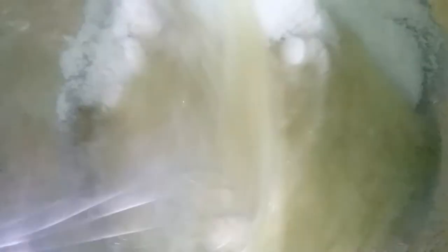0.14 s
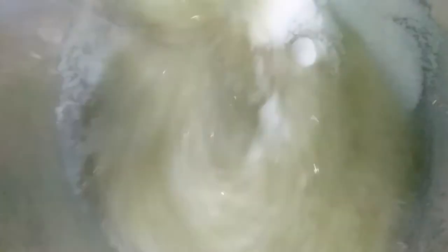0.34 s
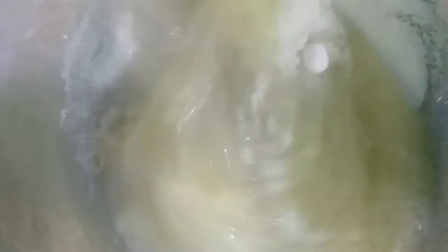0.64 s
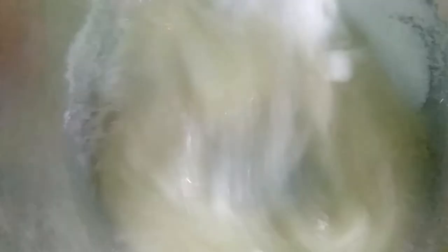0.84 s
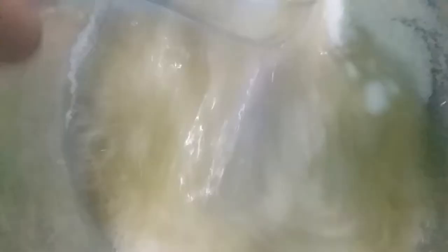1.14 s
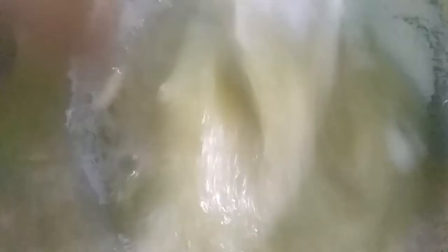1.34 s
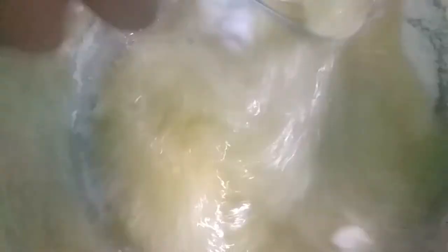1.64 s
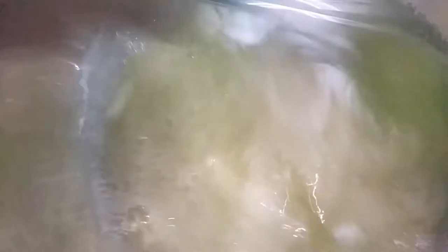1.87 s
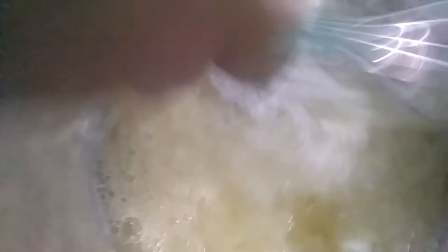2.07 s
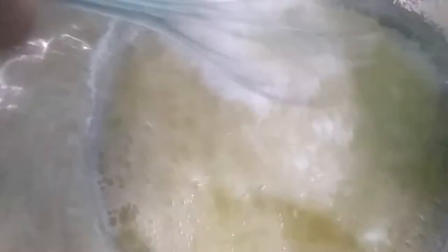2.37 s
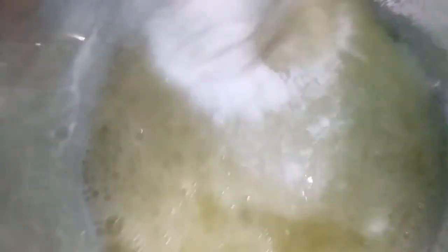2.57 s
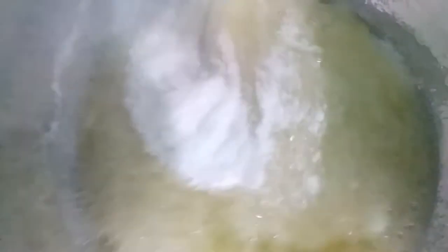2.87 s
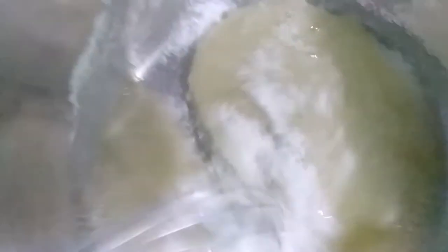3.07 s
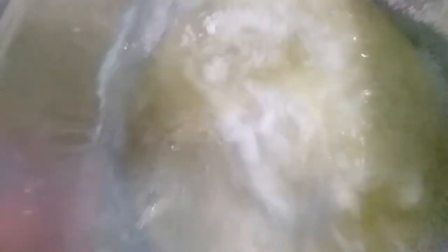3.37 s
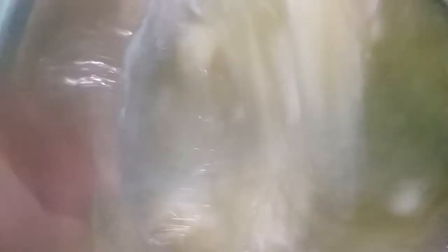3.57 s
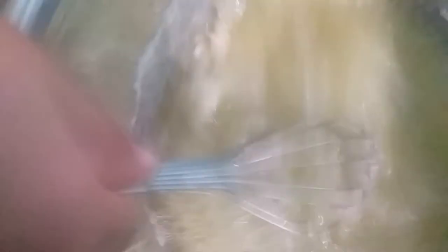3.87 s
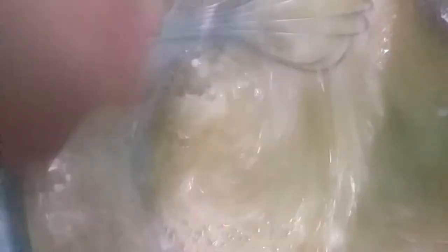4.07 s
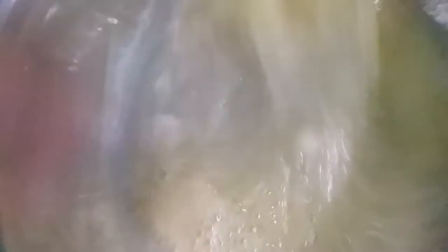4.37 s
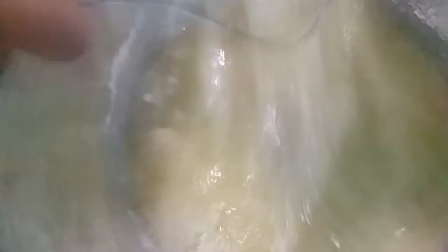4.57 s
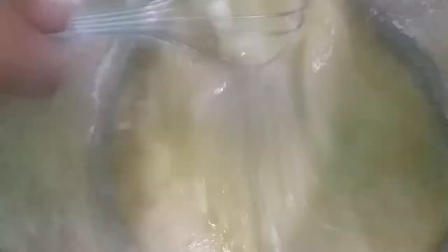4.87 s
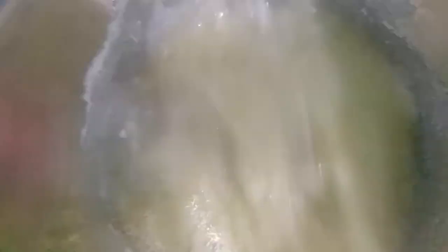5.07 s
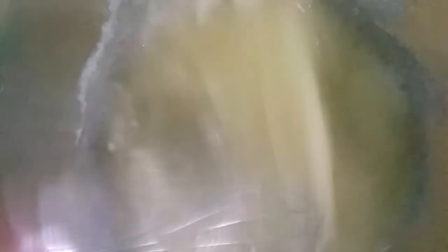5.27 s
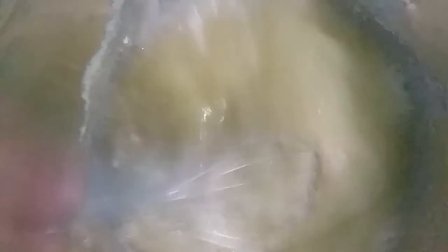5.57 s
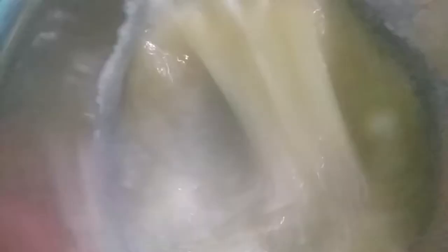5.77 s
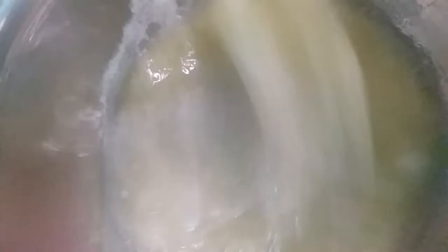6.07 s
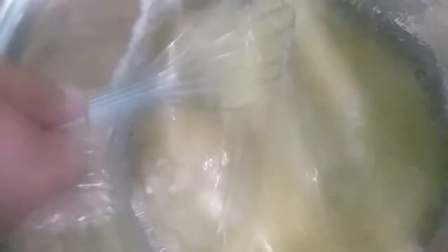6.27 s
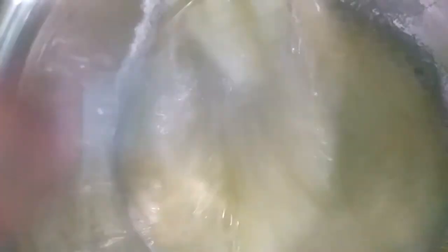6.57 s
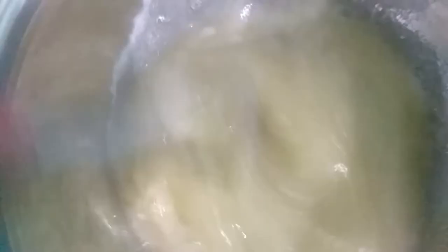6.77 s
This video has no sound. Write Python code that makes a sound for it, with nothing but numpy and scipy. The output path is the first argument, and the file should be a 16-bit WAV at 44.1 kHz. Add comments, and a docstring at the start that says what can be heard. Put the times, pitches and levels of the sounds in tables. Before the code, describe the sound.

Hand whisking in a small kitchen, heard close and mono. Wires rattle on the bowl in spaced, hard strokes at first, with bright scraping and metallic ringing, then in a busier run of damp clacks. Between hits, froth fizzes, liquid sloshes and an occasional plop sounds. Steady low appliance noise stays faintly behind.

```python
"""Whisk in a metal bowl

A wire whisk beats egg white in a metal bowl, close to a small microphone in a kitchen.
Each blow is a random rattle of wires that cracks, knocks and rings the wet bowl. Between blows,
filtered grains make wires dragging through froth, low noise slops, and fading modes thump, plop and ring.
Thin ticks are wires snapping together; a short room tail and faint appliance noise lie behind."""
import sys
import numpy as np
from scipy import signal
from scipy.fft import rfft, irfft
from scipy.io import wavfile
from scipy.ndimage import uniform_filter1d

SR = 44100
rng = np.random.default_rng(int(sys.argv[2]) if len(sys.argv) > 2 else 0)


def generate_wav(sig):
    """Save sig (samples, or channels by samples) to the path in sys.argv[1] as 16-bit PCM at SR."""
    pcm = np.round(np.clip(np.atleast_2d(sig).T, -1, 1) * 32767).astype(np.int16)
    wavfile.write(sys.argv[1], SR, pcm)


N = 305172


def amp(db):
    """Linear gain of a level in dB."""
    return 10 ** (np.asarray(db, float) / 20)


def level(x, db):
    """Scale a sound to an RMS level in dB."""
    return x * amp(db) / np.sqrt(np.mean(x ** 2))


def colour(points, size=1024):
    """Causal response of a spectrum, folded from the cepstrum of its log gain."""
    hz, db = np.transpose(points)
    grid_hz = np.arange(size + 1) * SR / 2 / size
    gain_db = np.interp(np.log(grid_hz + 1), np.log(hz), db)
    cepstrum = irfft(np.log(amp(gain_db)))
    cepstrum[1:size] *= 2
    cepstrum[size + 1:] = 0
    return irfft(np.exp(rfft(cepstrum)))[:size]


def rings(modes, seconds):
    """One sine per mode (f/Hz, level/dB, t60/s), fading exponentially."""
    t = np.arange(int(seconds * SR)) / SR
    return np.array([amp(db) * np.exp(-np.log(1000) * t / t60) * np.sin(2 * np.pi * hz * t)
                     for hz, db, t60 in modes])


def walk(rate):
    """Random levels held 1 / rate s and slewed twice; spread near 1."""
    k = int(SR / rate)
    steps = np.repeat(rng.standard_normal(N // k + 1), k)
    return 2.0 * uniform_filter1d(uniform_filter1d(steps, k), k)[:N]


def band_noise(order, low_hz, high_hz):
    """White noise through a Butterworth band."""
    band = signal.butter(order, [low_hz, high_hz], "bandpass", fs=SR, output="sos")
    return signal.sosfilt(band, rng.standard_normal(N))


def blur(note, width, db):
    """Moving froth roughens a ring: smoothed noise modulates its strength."""
    flutter = np.convolve(rng.standard_normal(len(note)), np.hanning(width), "same")
    return note * (1 + level(flutter, db))


def add(out, s, sound, peak_db):
    """Mix a sound in at a time, scaled to a peak."""
    i = int(s * SR)
    out[i:i + len(sound)] += (sound * amp(peak_db) / np.max(np.abs(sound)))[:N - i]


# spectrum of the kitchen air: f/Hz, relative level/dB per Hz
KITCHEN_SPECTRUM = [(15, -66), (25, 4.5), (317, -15.5), (373, -5.5), (754, -8), (1020, 6), (1260, 0.5),
                    (3340, -4), (5280, -11), (9840, -31), (16000, -33)]
KITCHEN_DB = -55
HUM_HZ, HUM_WIDTH_HZ, HUM_DB = 114.2, 21, -55


def kitchen():
    """Steady appliance noise with a blurred hum: coloured noise plus noise through a resonance."""
    air = signal.fftconvolve(rng.standard_normal(N), colour(KITCHEN_SPECTRUM, size=4096))[:N]
    hum_band = signal.iirpeak(HUM_HZ, HUM_HZ / HUM_WIDTH_HZ, fs=SR)
    hum = signal.lfilter(*hum_band, rng.standard_normal(N))
    return level(air, KITCHEN_DB) + level(hum, HUM_DB)


# how far the whisk beats above the liquid, on bare wall: t/s, bareness (0 submerged - 1 bare)
BARE = [(0.0, 0.27), (0.8, 0.62), (1.35, 0.039), (1.47, 0.7), (1.62, 0.22), (2.04, 0.77), (2.72, 0.86),
        (2.87, 0.11), (3.12, 0.16), (3.4, 0.56), (4.5, 0.32), (5.4, 0.089), (5.85, 0.2), (6.9, 0.14)]


def bareness(t):
    """Height of the whisk above the liquid, interpolated in time."""
    return np.interp(t, *np.transpose(BARE))


def by_bareness(wet, bare_wall, bare):
    """Blend a setting from submerged to bare wall."""
    return wet + (bare_wall - wet) * bare


def froth_grains(level_db):
    """Tiny pops and wire ticks, each band with its own pitch, flicker over a hiss."""
    grains = level(rng.standard_normal(N), -6) * amp(2.2 * walk(40))
    for hz in 1700 * 1.24 ** np.arange(8):
        pops = (rng.random(N) < .008) * rng.standard_normal(N) * amp(3.2 * walk(70))
        note = rings([(hz, 0, 10.5 / hz)], .02)[0]  # a few cycles
        note[0] = 0.13  # the snap that starts it
        grains = grains + level(signal.fftconvolve(pops, note)[:N], -11.5)
    return grains * amp(1.2 * walk(60) + level_db)


SETTLED_DB = -62.5  # relative level of still froth
AIR_HZ, AIR_TOP_HZ, AIR_DB = 9900, 15300, -77.5
AIR_FOLLOW = 0.64  # the hiss follows the sweeps only in part


def foam_hiss(level_db):
    """Fine treble hiss of the foam: flickering band noise."""
    air = band_noise(3, AIR_HZ, AIR_TOP_HZ)
    follow_db = AIR_FOLLOW * (level_db - SETTLED_DB)
    return air * amp(AIR_DB + follow_db + 1.4 * walk(16) + 2.7 * walk(90))


# slopping liquid: t/s, level/dB before the stirring is added
SLOP = [(0.0, -47.5), (1.5, -49.5), (3.18, -50), (3.78, -49), (4.49, -52.5), (5.03, -39.5), (5.17, -52.5),
        (6.73, -50.5), (6.92, -54)]
STIR_DB = -15  # low slosh dragged along by a sweep, against the listed sweep level


def slop(level_db, t):
    """Liquid slops low: uneven bass noise, stronger while the wires stir it."""
    slosh = level(band_noise(2, 70, 450) * amp(2.5 * walk(15)), 0)
    slop_db = np.interp(t, *np.transpose(SLOP))
    stirred = uniform_filter1d(amp(level_db + STIR_DB), 2000, origin=900)
    return slosh * np.hypot(amp(slop_db), stirred)


# spectrum of the froth: f/Hz, relative level/dB per Hz
FROTH = [(240, -14.5), (400, -0.5), (719, -11), (1130, -1.5), (2090, -11), (2550, -4.5), (4580, -1),
         (6850, -13), (9920, -31), (13900, -45), (16000, -41)]
# modes of the bowl, also rung by the blows: f/Hz, relative level/dB, t60/s
BOWL = [(2850, 2, .08), (3320, -5, .05), (3750, -7, .04), (4436, -7, .1), (4576, 0, .2), (4764, -1, .15),
        (4848, -1, .15), (5001, 0, .14), (5150, -3, .1), (5770, 2, .08), (5890, 3, .09), (6331, 3, .06),
        (6680, 3, .05), (7070, 3, .04)]
SCRAPE_HZ, SCRAPE_WET_DB, SCRAPE_BARE_DB = 6500, -14, 12.5  # on bare wall the wires scrape brighter
SING_DB = -17  # dragging wires keep the bare bowl singing, against the froth


def froth(level_db, bare):
    """Grains coloured by the foam, scraping the wall and singing in the bowl, under a treble hiss."""
    grains = froth_grains(level_db)
    pop = colour(FROTH)
    fizz = signal.fftconvolve(grains, pop / np.linalg.norm(pop))[:N]
    scrape = signal.lfilter(*signal.iirpeak(SCRAPE_HZ, 2.5, fs=SR), fizz)
    bowl = rings(BOWL, .3).sum(axis=0)
    singing = signal.fftconvolve(grains * bare, bowl / np.linalg.norm(bowl))[:N]
    fizz = fizz + scrape * amp(by_bareness(SCRAPE_WET_DB, SCRAPE_BARE_DB, bare))
    fizz = fizz + amp(SING_DB) * singing
    return amp(-6.0) * (fizz + foam_hiss(level_db))


# sweeps of the wires through the froth, and short clusters of ticks:
# t/s at full strength, hold/s, relative level/dB
SWEEPS = [(0.085, 0.014, -36), (0.136, 0.09, -34.5), (0.379, 0.091, -40.5), (0.431, 0.095, -36.5),
          (0.676, 0.0038, -30), (0.717, 0.012, -26.5), (0.8, 0.051, -38.5), (0.962, 0.066, -33),
          (1.019, 0.13, -44.5), (1.194, 0.095, -38), (1.31, 0.094, -45.5), (1.46, 0.0039, -34.5),
          (1.503, 0.1, -39), (1.663, 0.07, -41.5), (1.754, 0.055, -39.5), (1.827, 0.023, -31),
          (2.045, 0.07, -35), (2.352, 0.14, -35), (2.709, 0.052, -32), (2.78, 0.072, -37),
          (3.047, 0.11, -34.5), (3.348, 0.02, -33), (3.449, 0.02, -39.5), (3.598, 0.046, -32),
          (3.645, 0.067, -39), (3.726, 0.14, -44), (3.892, 0.035, -39.5), (3.991, 0.015, -39),
          (4.077, 0.0075, -37), (4.141, 0.066, -38), (4.242, 0.018, -35.5), (4.37, 0.026, -39),
          (4.428, 0.041, -37.5), (4.509, 0.013, -32.5), (4.613, 0.024, -35), (4.69, 0.065, -42.5),
          (4.779, 0.021, -30.5), (4.973, 0.01, -38), (5.006, 0.0096, -35.5), (5.071, 0.031, -35.5),
          (5.102, 0.1, -39.5), (5.262, 0.049, -39.5), (5.385, 0.011, -40), (5.556, 0.075, -36.5),
          (5.767, 0.012, -40), (5.831, 0.0094, -34.5), (5.874, 0.065, -38.5), (6.073, 0.04, -38),
          (6.2, 0.015, -38.5), (6.367, 0.065, -46), (6.51, 0.007, -36.5), (6.658, 0.018, -45),
          (6.76, 0.044, -45), (6.832, 0.0086, -45)]
SWEEP_RISE_DB_S, SWEEP_FALL_DB_S = 1804, 472  # fast in, slower out
SETTLE_DB, SETTLE_DB_S = -11, 134  # bubbles go on bursting: start in dB against the sweep, fall in dB/s


def sweeps(t):
    """Level in dB of the stirred froth: attack, hold, release, then a slow settling."""
    power = amp(2 * SETTLED_DB)
    for s, hold_s, level_db in SWEEPS:
        after = np.maximum(t - s - hold_s, 0)
        rise_db = -SWEEP_RISE_DB_S * np.maximum(s - t, 0)
        fall_db = np.maximum(-SWEEP_FALL_DB_S * after, SETTLE_DB - SETTLE_DB_S * after)
        power = power + amp(2 * (level_db + fall_db + rise_db))
    return 10 * np.log10(power)


LEAD_IN_S = .005  # a faint swell of ticks leads into the blow
RATTLE_WET_S, RATTLE_BARE_S = 0.0022, 0.0077  # how fast the bunch of wires dies away


def wire_bunch(bare, rattle_s):
    """Sparse random impulses swell faintly into the blow, then die away after it."""
    t = np.arange(2048) / SR
    sign, landing, softness = rng.random((3, 2048))
    lead_in = amp(-11.0 - 20 * bare) * t / LEAD_IN_S
    bunch = np.where(t < LEAD_IN_S, lead_in, np.exp((LEAD_IN_S - t) / rattle_s))
    wires = np.sign(sign - .5) * (landing < .15) * amp(-26 * softness) * bunch
    wires[int(LEAD_IN_S * SR)] = 0.96  # one strong wire always starts the blow
    return wires


# low wet modes of the bowl: f/Hz before a random shift, relative level/dB, t60/s
KNOCK = [(575, -11.5, 0.11), (684, 4, 0.01), (1188, 3.5, 0.023), (1910, 4.5, 0.0054)]
KNOCK_SPREAD = 0.1  # random share by which each mode's pitch varies per blow


def dull_knock():
    """Low wet modes sound together, with random pitch, strength and sign."""
    modes = [(f * (1 + KNOCK_SPREAD * rng.standard_normal()), db, t60) for f, db, t60 in KNOCK]
    strength = amp(2.14 * rng.standard_normal(len(KNOCK)))
    return rng.choice([-1, 1], len(KNOCK)) * strength @ rings(modes, .06)


# wires striking the bowl: t/s, peak level/dB of the crack before its bare-wall cut,
# brightest f/Hz, knock level/dB against the listed peak
BLOWS = [(0.096, -13.5, 4630, -9.5), (0.1257, -19, 4100, -28), (0.1434, -21, 3340, -35),
         (0.161, -8, 5340, -10), (0.1803, -16.5, 2890, -5.5), (0.434, -5.5, 4600, -27),
         (0.467, -12.5, 1580, -17), (0.4933, -9, 6540, -18), (0.508, -17, 4100, -30),
         (0.527, -20, 5030, -34), (0.6759, -18.5, 4700, -7.5), (0.7104, -4, 1640, -3.5),
         (0.832, -27, 5200, -30), (0.85, -24.5, 5160, -30), (0.968, -12, 5500, -9),
         (0.983, -30.5, 1500, 12), (0.995, -10, 2910, -12), (1.0136, -12.5, 4130, 0),
         (1.2229, -23.5, 5760, -1.5), (1.2496, -14, 5170, 0), (1.3293, -19.5, 4200, -7.5),
         (1.3805, -16.5, 5650, -35), (1.4563, -17, 4500, -19), (1.465, -17, 4800, 0.5),
         (1.511, -25, 2900, -18), (1.5375, -31, 2600, -5), (1.5497, -30, 4500, -6),
         (1.6119, -18.5, 4100, -36), (1.626, -21.5, 6300, -27), (1.8415, -11, 5500, -29),
         (1.853, -17, 2920, -23), (2.043, -6.5, 6460, -17.5), (2.049, -14, 4720, -11.5),
         (2.115, -24, 5140, -28), (2.328, -3, 5860, -19.5), (2.3572, -11, 5570, -20),
         (2.6925, -10.5, 3080, -17.5), (2.702, -6.5, 5270, -26), (2.418, -20.5, 6070, -34),
         (2.751, -16.5, 4400, -30), (2.832, -23, 3900, -5.5), (2.8638, -23, 4020, -35),
         (3.038, -10.5, 3800, -26), (3.042, -8.5, 4900, -18), (3.0948, -22, 5440, -29),
         (3.114, -14.5, 2760, -10), (3.122, -15, 3500, -9.5), (3.3598, -10.5, 4130, -13),
         (3.602, -16.5, 3880, -29), (3.6124, -8.5, 3670, -10), (3.6758, -10, 4400, -16),
         (3.909, -24, 2970, -5), (4.087, -17.5, 3970, -10), (4.1379, -19, 2850, -4),
         (4.2029, -18.5, 2970, -4.5), (4.386, -19, 3920, -14), (4.404, -24.5, 4000, -25),
         (4.425, -20.5, 2980, -2.5), (4.4576, -12.5, 3200, -8.5), (4.508, -16, 3080, -23),
         (4.62, -16.5, 3860, -14), (4.63, -16.5, 4230, -20), (4.706, -27.5, 4030, -25),
         (4.775, -14.5, 3540, -23), (4.785, -11.5, 5160, -18), (4.9209, -7, 3040, -21),
         (4.9684, -21.5, 4500, -32), (5.013, -21, 4230, -13), (5.0739, -13, 3980, -24),
         (5.0866, -5.5, 2450, -18), (5.1952, -12.5, 3930, -18), (5.3075, -23, 4860, -25),
         (5.3327, -15.5, 3370, -5.5), (5.376, -5, 3900, -46), (5.3844, -19, 3670, -15.5),
         (5.5088, -18, 5200, -15), (5.5759, -17.5, 2840, -3), (5.626, -28.5, 1750, 8),
         (5.6782, -13.5, 4600, -23.5), (5.759, -23, 4280, -17), (5.829, -15.5, 4440, -1),
         (5.877, -25.5, 4270, -12), (5.9112, -11.5, 5670, -26), (5.9224, -10.5, 4320, -16.5),
         (6.0305, -14.5, 2920, -16.5), (6.042, -23.5, 5270, -8.5), (6.2007, -18, 5340, -13),
         (6.2159, -21.5, 3950, -13), (6.319, -16, 4750, -18), (6.324, -9.5, 4140, -11),
         (6.329, -5.5, 3740, -43), (6.368, -22.5, 4840, -14), (6.5118, -14, 5540, -18.5),
         (6.665, -19, 4630, -4.5), (6.6816, -23, 3530, -11), (6.756, -11, 4870, -18.5),
         (6.847, -14, 4770, -19)]
# spectrum of a wire's crack, also used by the snaps: f/Hz, relative level/dB per Hz
CRACK = [(350, -23), (600, -28), (1190, -8.5), (1900, -1), (3430, 7), (4840, 11), (7000, 0.5), (8390, -9.5),
         (9760, -17.5), (13900, -73), (16000, -32)]
# thin tick of wire on wire, and ring of the bowl: dB against the listed peak of the blow
TICK_HZ, TICK_WET_DB, TICK_BARE_DB = 13300, -32, -35
RING_WET_DB, RING_BARE_DB = -32, 10.5


def whisk_blows():
    """Wires land in a bunch within a few ms; the contact point sets which part of the bowl answers."""
    out, crack = np.zeros(N), colour(CRACK)
    bowl, bowl_hz = rings(BOWL, 0.28), np.array(BOWL)[:, 0]
    tick = rings([(TICK_HZ, 0, .002)], 0.0022)[0]
    for s, peak_db, hz, knock_db in BLOWS:
        bare = bareness(s)
        rattle_s = RATTLE_WET_S * (RATTLE_BARE_S / RATTLE_WET_S) ** bare
        wires = wire_bunch(bare, rattle_s)
        patch = rings([(hz, 0, .004)], .01)[0]
        patch[0] = 3.56 * (0.0037 / rattle_s) ** 1.15  # a short hard contact snaps brighter
        nearness = np.exp(-(np.log(bowl_hz / hz) / 0.62) ** 2)
        struck = (nearness * amp(3 * rng.standard_normal(len(BOWL)))) @ bowl
        struck = blur(struck, 330, -6)
        crack_db = peak_db - 5 * bare ** 2  # on bare wall the ring takes over
        tick_db = peak_db + by_bareness(TICK_WET_DB, TICK_BARE_DB, bare)
        ring_db = peak_db + by_bareness(RING_WET_DB, RING_BARE_DB, bare ** 2)
        start = s - LEAD_IN_S
        add(out, start, signal.fftconvolve(wires, signal.fftconvolve(patch, crack)), crack_db)
        add(out, start, np.convolve(wires, tick), tick_db)
        add(out, start, signal.fftconvolve(wires[:512], struck), ring_db)
        add(out, start, signal.fftconvolve(wires[:768], dull_knock()), peak_db + knock_db)
    return out


# wires of the whisk snapping against each other: t/s, peak level/dB of the treble tick
SNAPS = [(0.106, -42), (0.1321, -45), (0.4194, -45), (0.6809, -35), (1.2228, -28), (1.472, -35),
         (2.042, -32), (2.3281, -19), (3.0584, -47), (3.836, -42.5), (4.0861, -35.5), (4.2084, -47),
         (4.3826, -42), (4.4707, -51), (4.5126, -39), (4.6299, -38), (4.92, -26), (5.3048, -47),
         (6.0432, -37), (6.2177, -35), (6.3794, -42)]
SNAP_S, SNAP_BODY_DB = 0.0013, 16.5  # how fast it dies; the crack against the tick


def snaps():
    """A fading noise burst excites a thin bright tick and a crack under it."""
    out, crack = np.zeros(N), colour(CRACK)
    tick = rings([(TICK_HZ, 0, .0016)], .002)[0]
    for s, peak_db in SNAPS:
        wires = rng.standard_normal(300) * np.exp(-np.arange(300) / SR / SNAP_S)
        add(out, s, np.convolve(wires, tick), peak_db)
        add(out, s, np.convolve(wires, crack), peak_db + SNAP_BODY_DB)
    return out


# liquid and bowl thumping: t/s just before the onset, peak level/dB, main f/Hz
THUMPS = [(0.159, -16.5, 345), (0.466, -30.5, 124), (0.704, -16.5, 515), (0.727, -24.5, 91),
          (1.002, -24, 263), (1.239, -29, 90.6), (1.261, -31, 346), (1.461, -21.5, 666), (2.322, -33, 95),
          (3.351, -33, 87), (3.606, -23.5, 426), (4.128, -32, 88.5), (4.196, -26.5, 497), (4.421, -32, 301),
          (4.464, -29, 102), (4.542, -28.5, 120), (4.802, -15, 319), (4.838, -26.5, 370), (4.997, -28, 119),
          (5.05, -29.5, 117), (5.103, -27, 113), (5.569, -25.5, 502), (5.625, -26.5, 460),
          (6.659, -31.5, 246)]
THUMP_T60_S, THUMP_SLOPE = 0.16, 0.8  # main mode at 100 Hz; higher thumps die sooner


def thumps():
    """A few soft uneven pushes into loose low modes."""
    out = np.zeros(N)
    push_t = np.arange(800) / SR
    for s, peak_db, hz in THUMPS:
        t60 = THUMP_T60_S * (100 / hz) ** THUMP_SLOPE
        low, high = rng.standard_normal(2)
        modes = [(hz, 0, t60),
                 (hz * 0.573 * 2 ** (0.18 * low), -6, t60 * 0.5),
                 (hz * 1.78 * 2 ** (0.394 * high), -5, t60 * 0.51)]
        pushes = rng.standard_normal(800)
        pushes[0] += 10  # the first push is the strongest
        pushes = np.convolve(pushes * np.exp(-push_t / 0.012), np.hanning(50))
        add(out, s + 0.00371, signal.fftconvolve(rings(modes, .3).sum(axis=0), pushes), peak_db)
    return out


# single low notes, wet plops and soft rings of the bowl: t/s, peak level/dB, f/Hz, t60/s
LOW_NOTES = [(1.797, -25.5, 1210, 0.024), (2.807, -30, 1300, 0.022), (4.665, -41, 1085, 0.26),
             (4.807, -25, 1070, 0.037), (5.107, -30, 1083, 0.15), (5.11, -28, 1450, 0.098),
             (5.148, -36, 1064, 0.081)]
NOTE_RISE_S = 0.0018


def plops_and_soft_rings():
    """A note that swells for a moment and fades, roughened by the froth."""
    out = np.zeros(N)
    for s, peak_db, hz, t60 in LOW_NOTES:
        note = blur(rings([(hz, 0, t60)], 0.13)[0], 300, -4)
        swell = 1 - np.exp(-np.arange(len(note)) / SR / NOTE_RISE_S)
        add(out, s, note * swell, peak_db)
    return out


ROOM_T60_S, ROOM_DB = .15, -22


def room(near):
    """Hard walls return a short diffuse tail: decaying noise with a gradual onset."""
    lag = np.arange(SR // 2) / SR
    fade = np.exp(-np.log(1000) * lag / ROOM_T60_S) * np.minimum(lag / 0.069, 1)
    tail = rng.standard_normal(len(lag)) * fade
    return amp(ROOM_DB) * signal.fftconvolve(near, tail / np.sqrt(np.sum(tail ** 2)))[:N]


BASS_CUT_HZ = 53  # deep bass is cut from the near sounds


def scene():
    """The bowl close to the microphone, its echo from the walls, the kitchen behind."""
    t = np.arange(N) / SR
    stirred_db = sweeps(t)
    near = froth(stirred_db, bareness(t)) + slop(stirred_db, t)
    near = near + whisk_blows() + snaps() + thumps() + plops_and_soft_rings()
    bass_cut = signal.butter(4, BASS_CUT_HZ, "highpass", fs=SR, output="sos")
    near = signal.sosfilt(bass_cut, near + room(near))
    return (near + kitchen())[None]


TOP_HZ = 16300


def record(dry):
    """The recorder rounds the loudest peaks and cuts the top."""
    top_cut = signal.ellip(12, .3, 100, TOP_HZ, fs=SR, output="sos")
    return signal.sosfilt(top_cut, 0.93 * np.tanh(dry / 0.89))


dry = scene()
out = record(dry)
generate_wav(out)
```